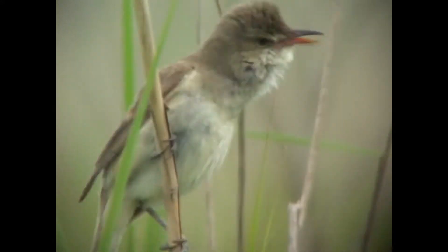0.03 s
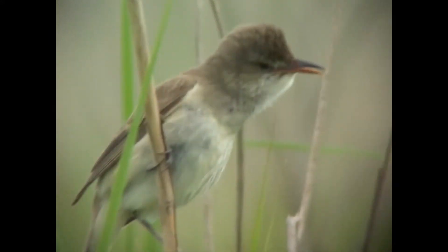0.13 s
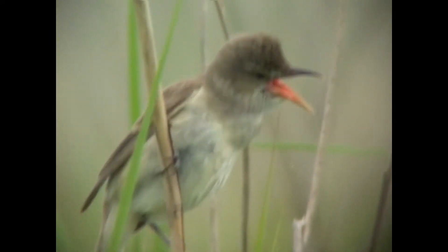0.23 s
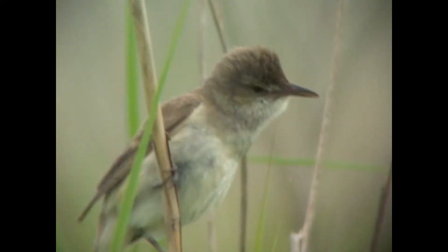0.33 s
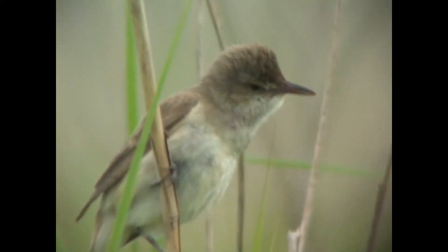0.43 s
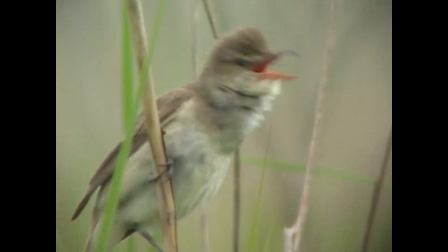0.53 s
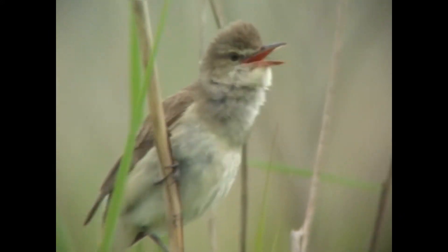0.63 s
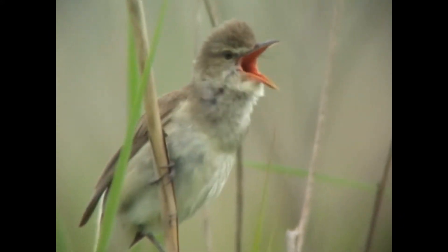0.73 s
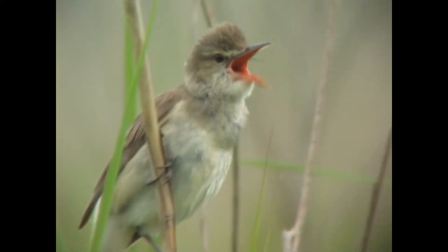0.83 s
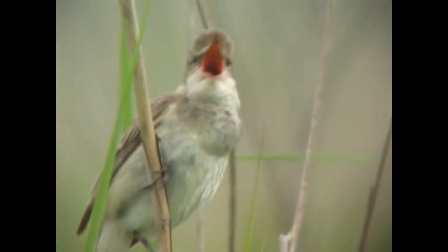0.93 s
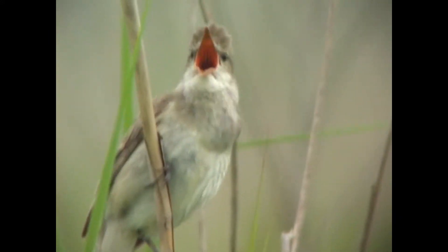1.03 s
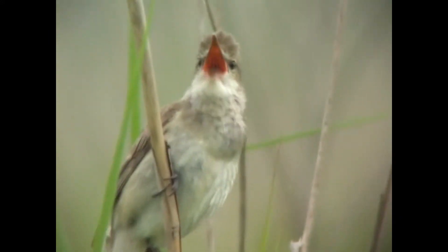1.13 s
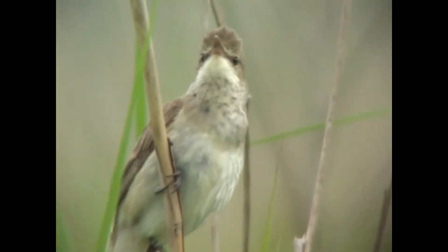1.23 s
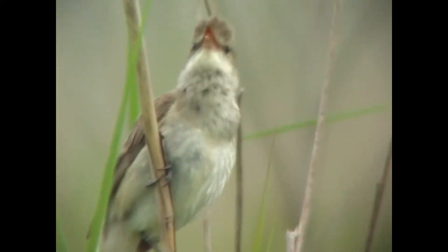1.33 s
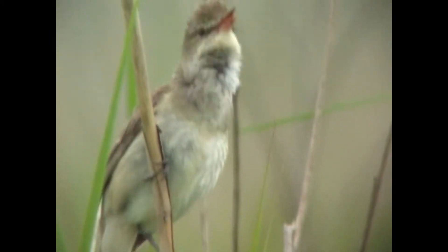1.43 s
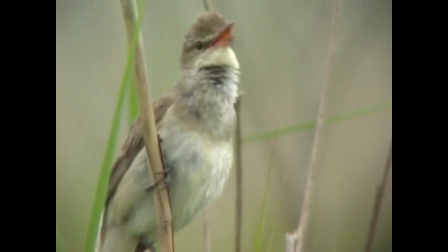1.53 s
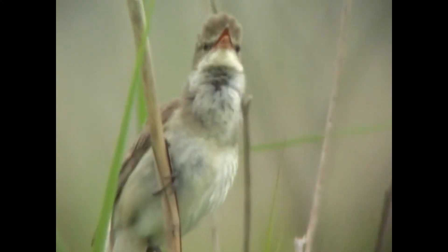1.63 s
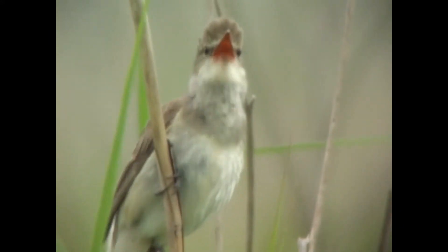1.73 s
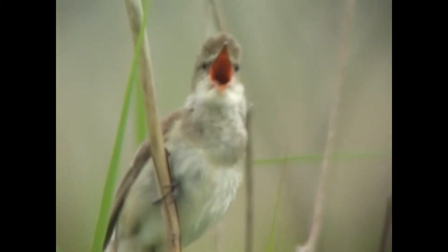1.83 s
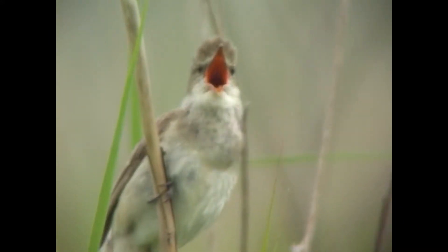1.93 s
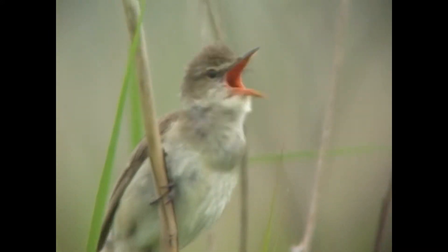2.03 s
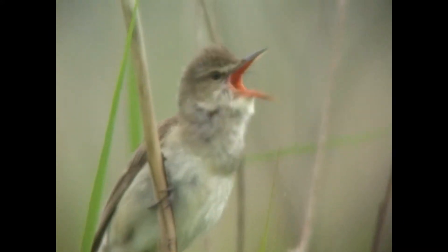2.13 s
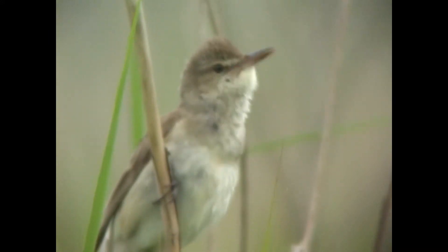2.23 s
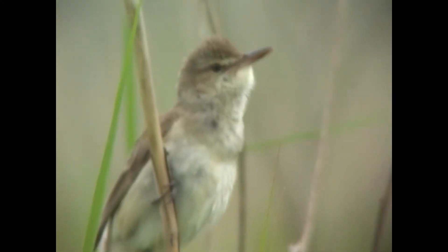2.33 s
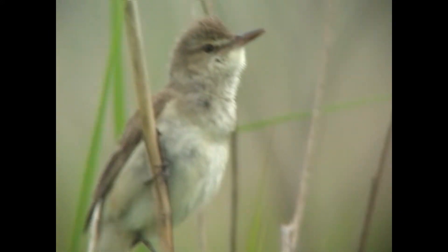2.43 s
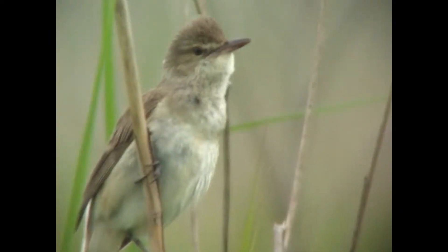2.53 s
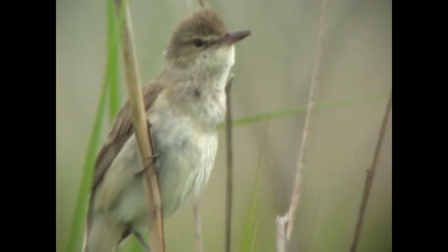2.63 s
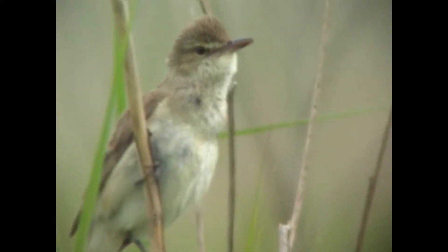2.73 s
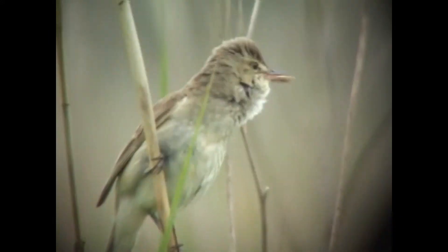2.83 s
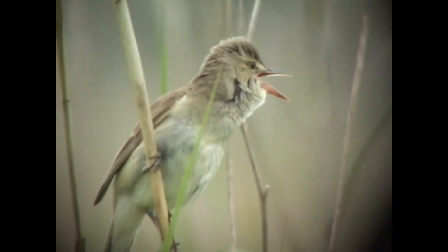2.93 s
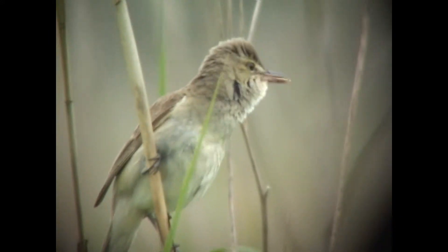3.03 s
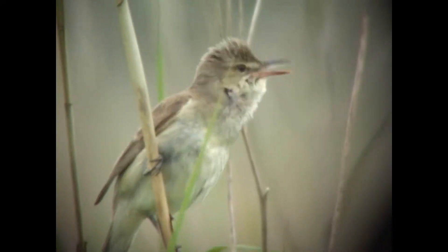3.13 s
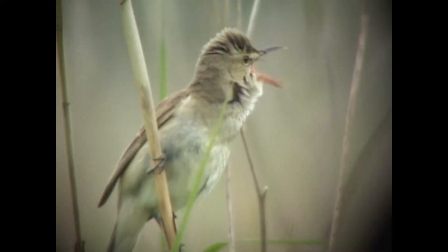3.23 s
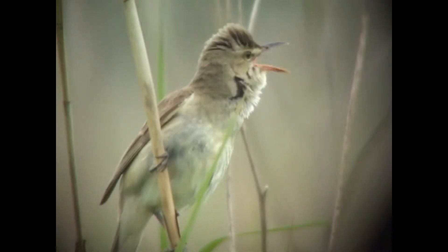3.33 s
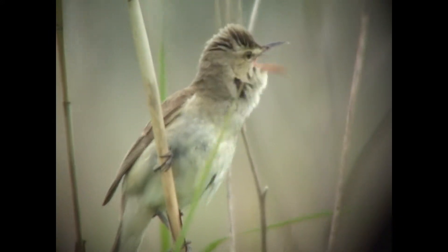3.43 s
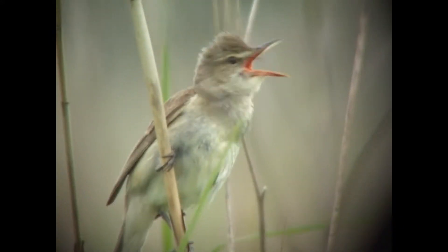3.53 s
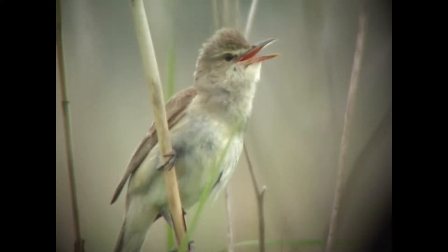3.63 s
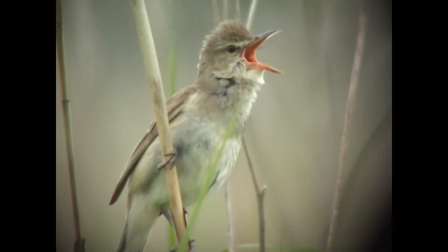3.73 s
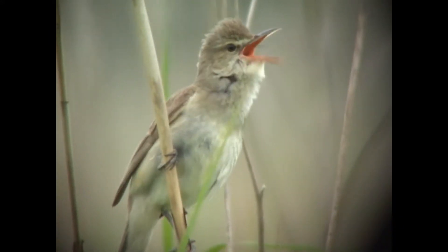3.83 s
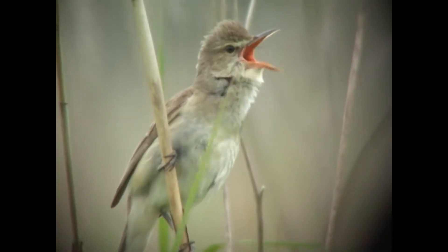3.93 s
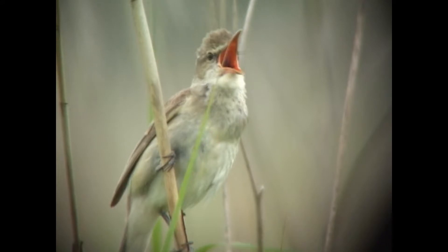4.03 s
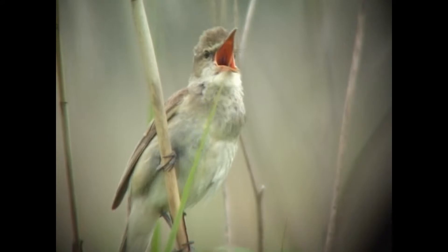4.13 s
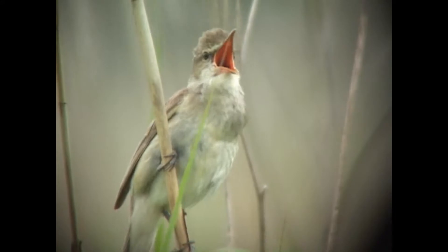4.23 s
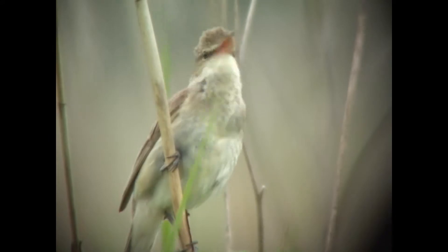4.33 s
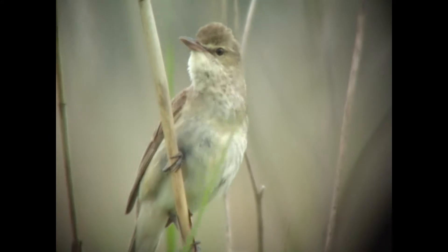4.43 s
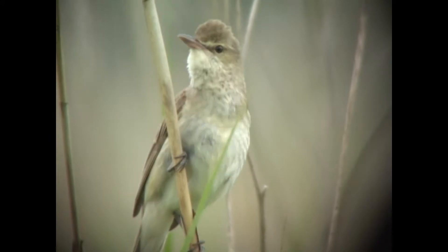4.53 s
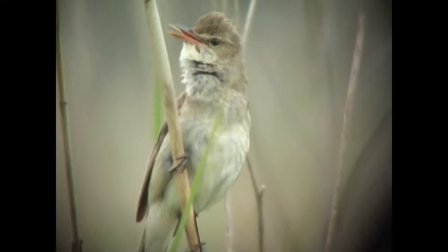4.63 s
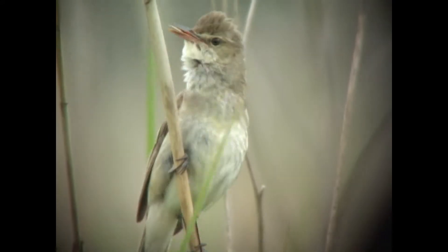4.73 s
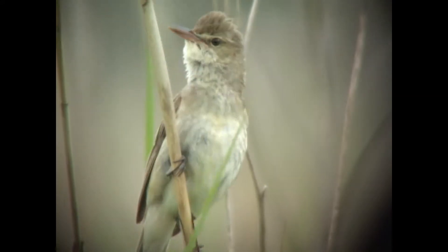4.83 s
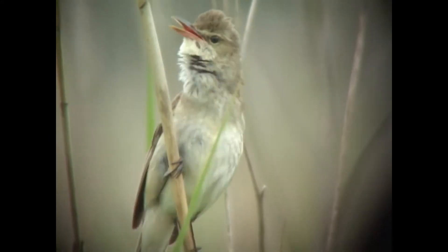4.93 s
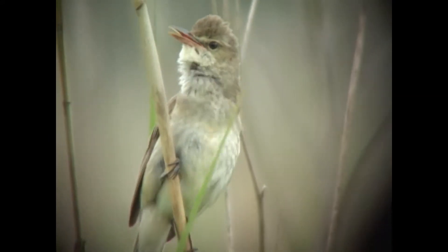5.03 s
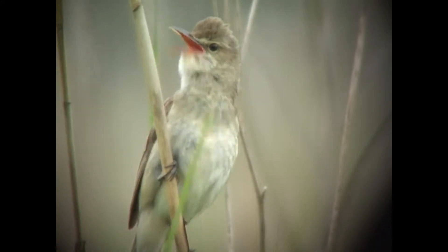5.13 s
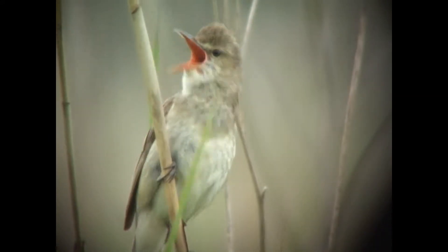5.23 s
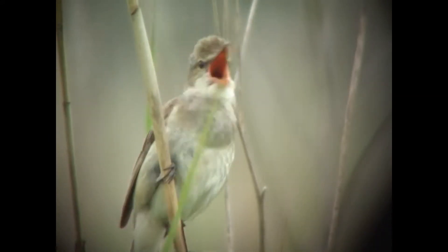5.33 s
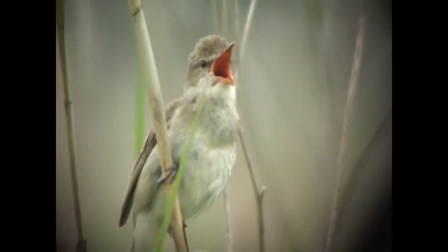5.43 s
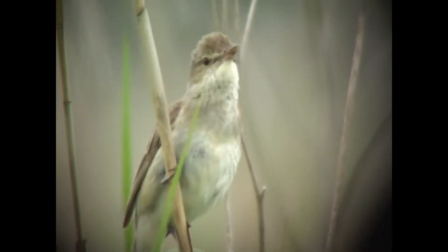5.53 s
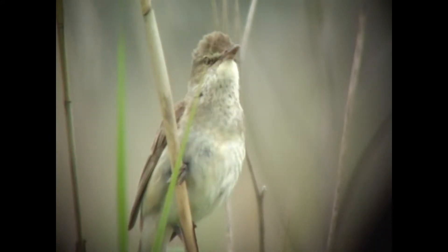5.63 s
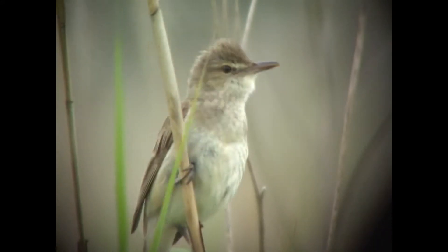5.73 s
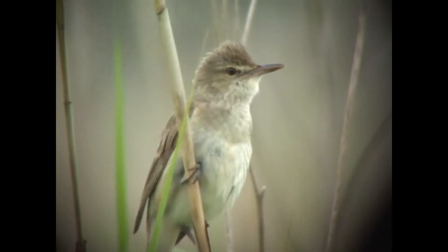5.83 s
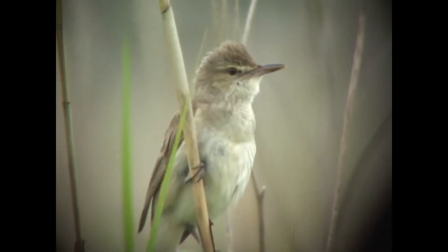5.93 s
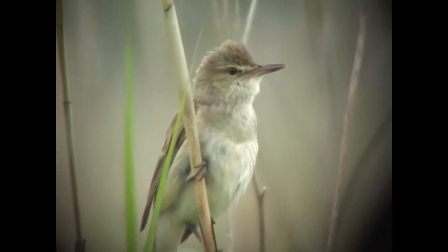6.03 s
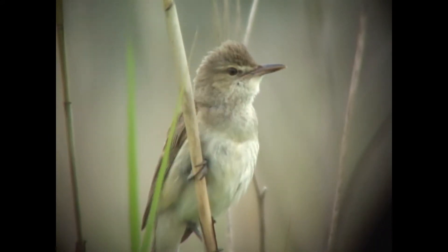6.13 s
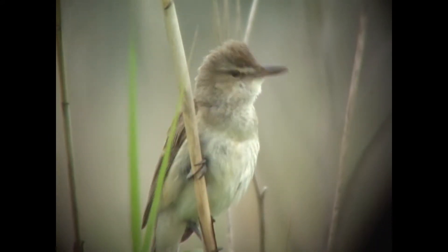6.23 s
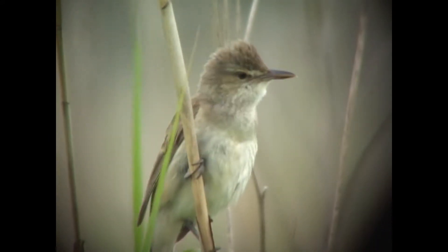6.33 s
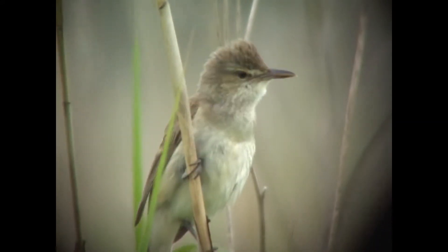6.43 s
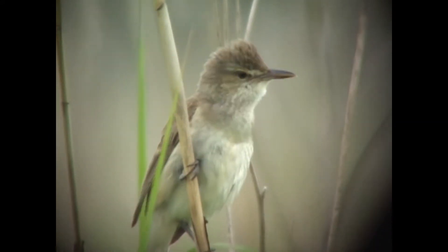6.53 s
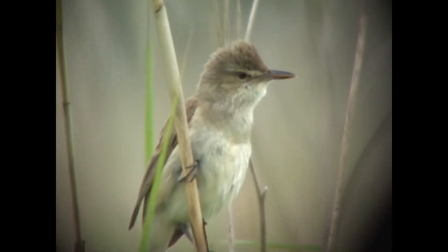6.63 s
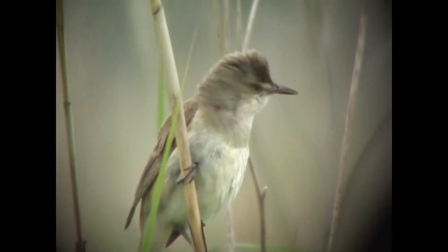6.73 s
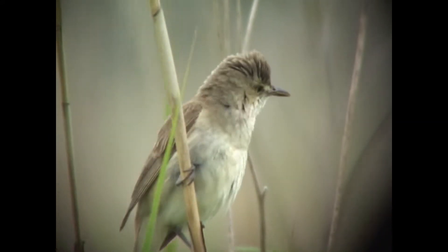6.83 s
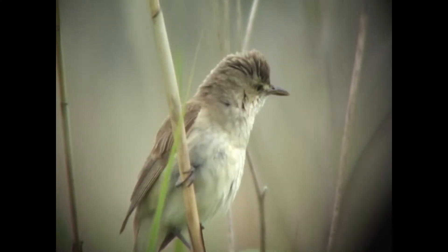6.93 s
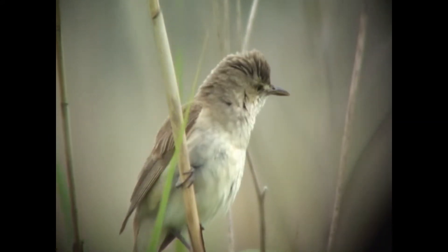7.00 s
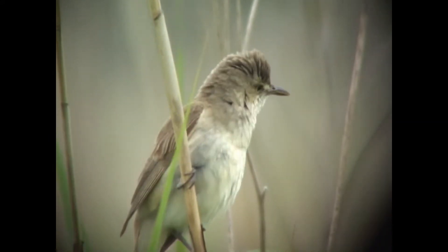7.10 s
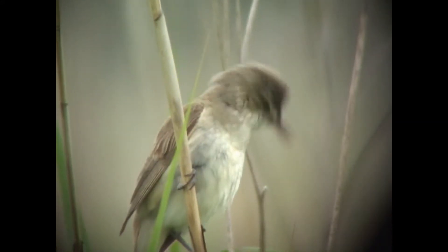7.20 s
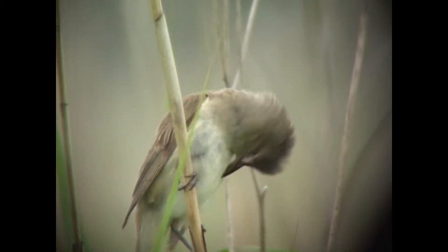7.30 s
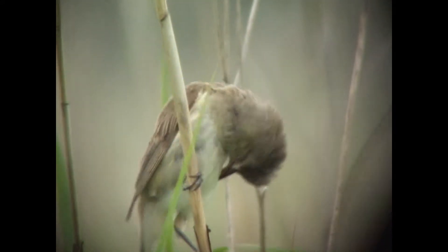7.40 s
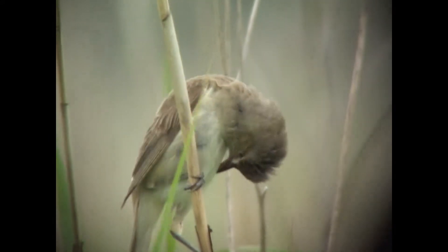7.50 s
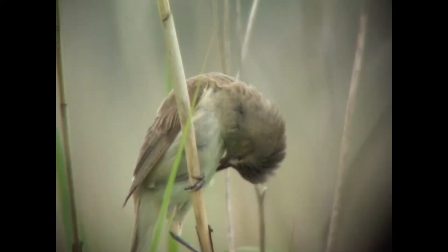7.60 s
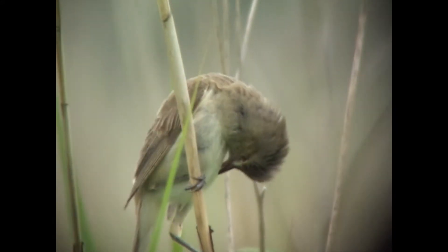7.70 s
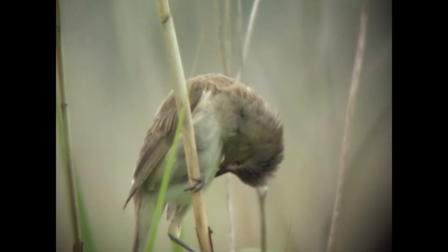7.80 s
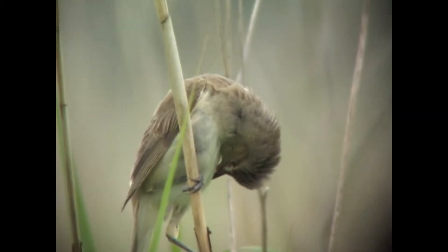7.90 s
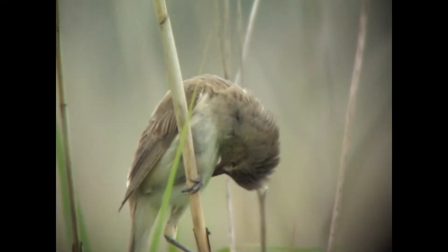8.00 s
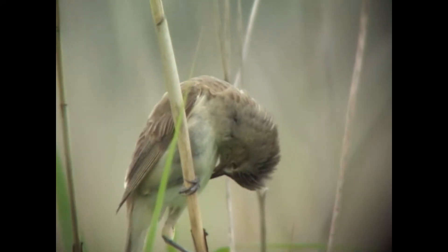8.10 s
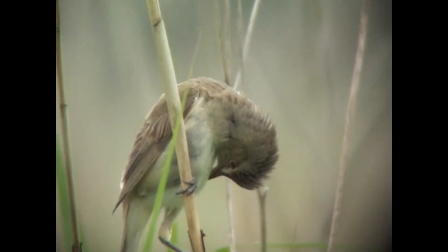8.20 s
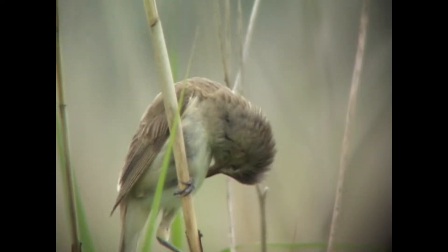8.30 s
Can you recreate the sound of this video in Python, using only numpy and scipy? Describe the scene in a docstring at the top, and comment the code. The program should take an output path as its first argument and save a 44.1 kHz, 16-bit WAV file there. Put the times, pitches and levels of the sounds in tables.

```python
"""Grating croaks come first, from a great reed warbler close in front of a stereo microphone in a reed bed.
Whistles, nasal buzzes, dry rattles and squeaky clacks follow: tones of its syrinx, or pulses rung through
throat and beak. A neighbour answers on the left, other birds call farther out, and the stems scatter
a short echo. A faint insect trill comes and goes on the right, over moving air and distant machinery."""
import sys
import numpy as np
from scipy import signal
from scipy.fft import rfft, irfft, next_fast_len
from scipy.io import wavfile
from scipy.ndimage import map_coordinates

SR = 44100
rng = np.random.default_rng(int(sys.argv[2]) if len(sys.argv) > 2 else 0)


def waveform_to_disk(signal):
    """Save audio, clipped to [-1, 1], as 16-bit WAV at the path in sys.argv[1]."""
    frames = np.transpose(np.atleast_2d(signal))
    scaled = np.clip(frames, -1, 1) * 32767
    samples = np.round(scaled).astype(np.int16)
    wavfile.write(sys.argv[1], SR, samples)


N = 368676

# spectra of the rush of air and of the rumble: frequency_hz, relative_db
RUSH_SPECTRUM = [(60, -27), (110, -14), (200, -8), (400, -10.5), (700, -11), (900, -10), (1130, -10),
                 (1550, -16), (2600, -15.5), (4000, -16.5), (6500, -18), (10500, -22.5)]
RUMBLE_SPECTRUM = [(12, -9), (25, -1.5), (45, 5), (60, 0.5), (100, -13), (170, -23), (400, -56)]
# their rise and fall: time_s, relative_db
RUSH_LEVELS = [(0, -59.5), (2.7, -60), (3.9, -59), (6.7, -58.5), (8.36, -60.5)]
RUMBLE_LEVELS = [(0.0, -61), (0.07, -53.5), (0.18, -60.5), (1.35, -59), (1.56, -47.5), (1.72, -52.5),
                 (1.77, -49.5), (2.23, -55.5), (5.26, -57.5), (7.8, -60), (8.1, -66), (8.36, -61)]
# how alike the rush is at the two capsules: frequency_hz, correlation
RUSH_LIKENESS = [(100, 0.095), (500, 0.082), (1200, 0.39), (2500, 0), (9000, 0)]
# low swells of air: peak_s, half_width_s, level_db
AIR_SWELLS = [(2.63, 0.23, -68), (3.6, 0.15, -69), (6.63, 0.34, -67)]
# distant machinery and a thin whine: pitch_hz, level_db, left_over_right_db, left_lead_rad
HUM_LINES = [(84.3, -55, 4, 0.24), (217.5, -66, -7, 2.5), (233.7, -83, -17, 1.5), (568, -72, -8.5, 3),
             (1110, -81, -11.5, 0.9), (6000, -84, -17.5, 2)]
# insect trills: start_s, end_s
INSECT_TRILLS = [(.078, .5), (1.301, 1.647), (2.3, 2.707), (2.87, 3.132), (3.475, 3.857), (4.417, 4.83),
                 (5.45, 5.884), (6.383, 6.844), (7.333, 7.746)]

# resonances of throat and beak: multiple_of_throat_hz, relative_db
RASP_SHAPE = [(.12, -50), (.25, -22), (.42, -29), (.58, -12), (.78, -4), (.97, 1.5), (1.3, -5), (1.5, -18),
              (1.8, -25.5), (2.2, -22.5), (2.601, -33.5)]
CROAK_SHAPE = [(.22, -59), (.4, -12.5), (.63, -34.5), (.83, -3.5), (.98, 0), (1.18, 1.5), (1.45, -24),
               (2, -23.5), (3, -36), (4, -33.5)]
BUZZ_SHAPE = [(.2, -58), (.4, -20), (.64, -33.5), (.78, -8.5), (1, 4), (1.22, -4), (1.45, -8),
              (1.75, -21.5), (2.3, -34), (2.9, -24.5), (3.4, -61)]
# partials of the syrinx: multiple_of_pitch, relative_db
CROAK_PARTIALS = [(1 / 3, -32), (1 / 2, -19), (5 / 6, -26), (0.96, 0), (7 / 6, -7), (4 / 3, -9),
                  (3 / 2, -15), (11 / 6, -24)]
SQUEAK_PARTIALS = [(.5, -29.5), (1, -1), (1.5, -19.5), (2, -29.5), (2.5, -24.5)]
NEIGHBOUR_PARTIALS = [(.5, -7), (1, 5.5), (1.5, -5), (2, -15)]

# close croaks, levels relative: start_s, growl_s, growl_db, stutter_s, stutter_db, grunts_per_s, pitch_hz
NEAR_CROAKS = [(0.031, 0.018, -48.5, 0.027, -40, 153, 2657), (0.216, 0.021, -45, 0.025, -39.5, 187, 2610),
               (1.535, 0.036, -37.5, 0.098, -39.5, 84, 2740), (1.748, 0.04, -38, 0.077, -42.5, 111, 2660),
               (4.790, .042, -41, 0.072, -47.5, 98, 2564), (5.077, 0.046, -40.5, 0.071, -44.5, 100, 2556)]
# close whistles: start_s, length_s, level_db, start_hz, middle_hz, end_hz, flutter_hz
NEAR_WHISTLES = [(0.358, 0.059, -39, 5300, 5430, 5740, 290), (0.41, 0.045, -35, 5930, 5640, 5220, 250),
                 (3.08, 0.051, -45, 4370, 4080, 4260, 51), (3.135, 0.052, -45.5, 4230, 4080, 3930, 20),
                 (3.692, 0.042, -43, 6820, 6360, 5440, 260), (3.738, 0.037, -43, 5920, 6420, 5280, 58)]
# close buzzes, levels relative: start_s, length_s, buzz_db, start_hz, top_hz, chip_db, upper_strength
NEAR_BUZZES = [(0.712, 0.076, -39, 558, 629, -37, 0.2), (0.883, .071, -37, 593, 648, -34.5, 0.56),
               (3.369, .075, -39.5, 565.5, 636, -38.5, 0.3), (3.545, 0.072, -37.5, 578, 620, -35.5, 0.58),
               (3.891, 0.072, -34, 598, 624.5, -32, 0.58), (4.057, 0.074, -33.5, 605.6, 625.7, -31, 0.62)]
# close rattle figures, a double beat then a single: start_s, double_db, single_db
NEAR_RATTLES = [(1.029, -38, -31.5), (1.111, -31, -33), (1.189, -31.5, -30), (1.269, -32.5, -32.5),
                (4.185, -32, -29), (4.269, -32, -30), (4.345, -32.5, -30.5), (4.423, -33.5, -32)]
# bursts within each beat: delay_s, length_s, relative_db, throat_hz
DOUBLE_BURSTS = [(0, 0.0071, 0, 4440), (.011, 0.0067, -0.5, 4570), (.027, .005, -16.5, 4300)]
SINGLE_BURSTS = [(.0415, 0.0084, -2, 4400), (.052, 0.006, -13, 4030)]
# close clacks with squeaks: start_s, clack_s, clack_db, throat_hz, squeak_s, squeak_db, middle_hz, end_hz
NEAR_CLACKS = [(1.948, 0.015, -29, 4320, .028, -30.5, 3700, 3310),
               (2.033, 0.013, -29, 4360, 0.022, -31.5, 3720, 3820),
               (2.119, 0.012, -31, 4420, 0.021, -34, 3720, 3800),
               (2.213, 0.013, -31, 4320, 0.025, -32.5, 3790, 4020),
               (2.3, .01, -31.5, 4240, 0.026, -36, 3930, 3880),
               (5.347, 0.014, -36, 3840, 0.019, -37, 3560, 3440),
               (5.435, 0.014, -35.5, 4110, 0.023, -38, 3550, 3800),
               (5.518, 0.014, -35, 4400, 0.027, -39.5, 3750, 3830),
               (5.624, 0.012, -34, 4420, 0.029, -38.5, 3860, 3780)]
# close, soft clucks: start_s, level_db, throat_hz
NEAR_CLUCKS = [(2.9, -51, 1780), (2.956, -57, 2150), (2.968, -48.5, 2400), (2.98, -47.5, 2120),
               (3.009, -50.5, 2070)]

# the neighbour's lone rasps: start_s, length_s, level_db, throat_hz
NEIGHBOUR_RASPS = [(.002, .012, -51.5, 2980), (.185, 0.035, -52, 2900), (.465, 0.05, -54, 3420),
                   (3.485, 0.011, -51, 3860), (3.801, 0.0075, -50.5, 4070), (3.99, 0.016, -52, 4400),
                   (4.91, .01, -50.5, 2898), (4.945, 0.012, -52.5, 2790), (5.03, 0.01, -53, 3760),
                   (5.232, 0.017, -55.5, 3000), (5.27, .015, -53.5, 2940), (5.303, 0.024, -53, 2950)]
# its runs of ticks: start_s, end_s, period_s
NEIGHBOUR_TICKS = [(.285, .635, .0227), (3.027, 3.26, .0533), (4.529, 4.61, .034)]
# loudness of each run: level_db
TICK_LEVELS = [-55.5, -49.5, -53.5]
# its chips: start_s, length_s, level_db
NEIGHBOUR_CHIPS = [(5.349, 0.021, -42), (5.409, 0.022, -38.5), (5.48, 0.019, -37), (5.567, 0.017, -36.5)]
# its three-part calls: start_s, tick_db, slur_db
NEIGHBOUR_CALLS = [(5.696, -40.5, -52), (5.858, -42.5, -53.5), (6.009, -42, -58)]
# pure slurs far off to the right: start_s, length_s, level_db, start_hz, middle_hz, end_hz
DISTANT_SLURS = [(1.89, 0.058, -61.5, 2070, 1710, 1430), (2.376, 0.032, -60, 2620, 2320, 2860),
                 (2.423, 0.041, -59, 1870, 1950, 2100), (2.518, 0.034, -63, 1650, 1770, 1670),
                 (2.579, 0.043, -66.5, 1410, 1310, 1330), (4.334, 0.268, -68, 1670, 1618, 1610),
                 (4.655, 0.073, -61, 1390, 1630, 1590), (4.8, 0.048, -58, 1690, 1880, 2140),
                 (4.953, 0.056, -59.5, 2310, 1934, 1240), (5.135, 0.041, -62, 4500, 5050, 5450),
                 (6.61, 0.046, -67.5, 3950, 3150, 2910), (6.685, .04, -70, 5700, 5600, 5100),
                 (6.815, .18, -70, 3610, 3970, 4010)]
# a small bird far ahead: start_s, level_db, start_hz
DISTANT_PEEPS = [(5.262, -63, 5100), (5.954, -64, 4800), (6.427, -62.5, 4900), (6.49, -59, 5040),
                 (7.538, -63, 5000), (7.591, -54.5, 5540), (7.645, -52, 5400)]
# two-note calls far off to the left: start_s, level_db, pitch_hz
DISTANT_PAIRS = [(7.8, -62.5, 2800), (8.139, -56, 3660), (8.268, -53, 3740)]

SIDES = np.array([[.5], [-.5]])  # half of a difference goes to the left capsule, half to the right


def amp(db):
    return 10 ** (np.asarray(db) / 20)


def unit(x):
    return x / np.sqrt(np.mean(x ** 2) + 1e-20)


def along(points, hz):
    """Read (frequency_hz, value) points on a log frequency axis."""
    frequencies, values = np.transpose(points)
    return np.interp(np.log(hz + 1e-6), np.log(frequencies), values)


def curve(rows):
    """One value per sample from (time_s, value) rows."""
    return np.interp(np.arange(N) / SR, *np.transpose(rows))


def wobble(rate, size):
    """A smooth random curve with rate knots a second."""
    knots = rng.standard_normal(int(size * rate / SR) + 4)
    return map_coordinates(knots, [np.arange(size) * rate / SR])


def filtered(x, response):
    """Multiply the spectrum of x by response(hz)."""
    size = next_fast_len(N + 8192)
    return irfft(rfft(x, size) * response(np.fft.rfftfreq(size, 1 / SR)), size)[..., :N]


def add(track, start_s, sound):
    part = track[max(round(start_s * SR), 0):][:len(sound)]
    part += sound[:len(part)]


def clock(length_s):
    """Time within a note: t in seconds, u from 0 to 1."""
    t = np.arange(max(int(length_s * SR), 32)) / SR
    return t, t / t[-1]


def envelope(t, rise_s, fall_s):
    """A smooth onset and release."""
    opening = np.sin(np.pi / 2 * np.minimum(t / rise_s, 1))
    closing = np.sin(np.pi / 2 * np.minimum((t[-1] - t) / fall_s, 1)) ** 2
    return opening * closing


def phase(hz):
    return 2 * np.pi * np.cumsum(hz) / SR


def slur(u, start_hz, middle_hz, end_hz):
    """A pitch arc through three points."""
    return start_hz * (1 - u) * (1 - 2 * u) + middle_hz * 4 * u * (1 - u) + end_hz * u * (2 * u - 1)


def pulses(rate_hz, scatter_db):
    """One pulse per cycle of the syrinx, each of its own size."""
    samples = np.arange(len(rate_hz))
    cycles = np.cumsum(rate_hz) / SR + .9
    onsets = np.interp(np.arange(1, max(int(cycles[-1]), 1) + 1), cycles, samples)
    return amp(scatter_db * rng.standard_normal(len(onsets))) @ np.sinc(samples - onsets[:, None])


def throat(x, shape, hz, size=1024):
    """Ring x through the resonance of throat and beak, keeping a short tail."""
    cepstrum = irfft(np.log(amp(along(shape, np.fft.rfftfreq(size, 1 / SR) / hz))))
    cepstrum[1:size // 2] *= 2  # minimum phase: the ringing follows each pulse
    cepstrum[size // 2 + 1:] = 0
    rung = np.convolve(x, irfft(np.exp(rfft(cepstrum)))[:size // 4])
    return rung / np.sqrt(np.sum(rung ** 2) / len(x) + 1e-20)


def rasp(length_s, shape, hz, rate_hz, jitter, breath):
    """Chaotic syrinx pulses with a little turbulence, through the throat."""
    t, _ = clock(length_s)
    beats = unit(pulses(rate_hz * np.exp(jitter * wobble(rate_hz, len(t))), scatter_db=-0.5))
    source = beats + breath * rng.standard_normal(len(t))
    return throat(source * envelope(t, 0.26 * t[-1], .42 * t[-1]), shape, hz)


def voiced(hz, partials, hoarse):
    """A syrinx tone built from partials; hoarseness shakes its pitch and level."""
    turn = phase(hz * (1 + hoarse * wobble(2206, len(hz))))
    tone = sum(amp(db) * np.sin(k * turn + rng.uniform(0, 2 * np.pi)) for k, db in partials)
    return unit(tone * (1 + 2 * hoarse * wobble(1518, len(hz))))


def air():
    """A soft rush over the marsh with low swells, and a rumble that differs at each capsule."""
    def mid_and_side(hz):
        angle = np.arccos(np.clip(along(RUSH_LIKENESS, hz), -1, 1)) / 2
        return amp(along(RUSH_SPECTRUM, hz)) * [np.cos(angle), np.sin(angle)]

    def band(spectrum):
        return unit(filtered(rng.standard_normal((2, N)), lambda hz: amp(along(spectrum, hz))))

    mid, side = filtered(rng.standard_normal((2, N)), mid_and_side)
    rush = unit(np.array([mid + side, mid - side])) * amp(curve(RUSH_LEVELS) + 0.72 * wobble(4, N))
    t = np.arange(N) / SR
    swells = amp(-80) + sum(amp(db) * np.exp(-((t - s) / width) ** 2) for s, width, db in AIR_SWELLS)
    low_air = band([(150, -45), (300, -4), (400, 1), (520, -6.5), (900, -26), (2000, -58)])
    rumble = amp(curve(RUMBLE_LEVELS) + 4) * band(RUMBLE_SPECTRUM)
    return rush + swells * low_air + rumble


def machinery():
    """Distant hums and a thin whine, wavering slightly in pitch and level."""
    out = np.zeros((2, N))
    for hz, db, pan_db, lead_rad in HUM_LINES:
        turn = phase(hz + 0.03 * np.sqrt(hz) * wobble(3, N))
        level = amp(db + SIDES * pan_db + 0.49 * wobble(3.2, N))
        out += level * np.sqrt(2) * np.sin(turn + SIDES * lead_rad)
    return out


def rasps(rows, rate_hz):
    """Dry bursts of syrinx pulses, one for each row."""
    out = np.zeros(N)
    for s, length, db, hz in rows:
        add(out, s, amp(db) * rasp(length, RASP_SHAPE, hz, rate_hz, jitter=0.253, breath=0.29))
    return out


def croaks():
    """Close by, an arched growl falls apart into fading grunts that sink in pitch."""
    out = np.zeros(N)
    for s, growl_s, growl_db, stutter_s, stutter_db, grunts_per_s, hz in NEAR_CROAKS:
        t, u = clock(growl_s)
        tone = voiced(hz * slur(u, 0.94, 1.03, 0.884), CROAK_PARTIALS, hoarse=0.027 + 0.084 * u ** 2)
        grit = rasp(growl_s, CROAK_SHAPE, hz * 0.973, rate_hz=480, jitter=0.15, breath=0.34)[:len(t)]
        flow = envelope(t, 0.0025, 0.0015) * amp(3.3 * np.sin(np.pi * u))
        add(out, s, amp(growl_db) * unit((tone + (0.36 + .5 * u) * grit) * flow))
        t, u = clock(0.88 / grunts_per_s)
        for delay in np.arange(0, stutter_s - .003, 1 / grunts_per_s):
            late = delay / stutter_s
            tone = voiced(hz * (.99 - .1 * late - 0.18 * u), CROAK_PARTIALS, hoarse=0.11)
            grit = rasp(t[-1], CROAK_SHAPE, hz * 0.935, rate_hz=783, jitter=0.27, breath=0.39)[:len(t)]
            grunt = unit((tone + 1.35 * grit) * envelope(t, 0.0046, 0.0044))
            onset_s = s + growl_s + delay + rng.normal(0, .0003)
            add(out, onset_s, amp(stutter_db - 1 - 7.8 * late + rng.normal(0, 1)) * grunt)
    return out


def chatter(count=140):
    """Very faint twitters from the far side of the marsh."""
    out = np.zeros(N)
    for when, size, pitch, bend in rng.random((count, 4)):
        t, u = clock(0.024 + .03 * bend)
        hz = (2000 + 1700 * pitch) * (1 + .5 * (bend - .6) * u)
        twitter = voiced(hz, [(1, 0)], hoarse=.07) * envelope(t, .006, .01)
        add(out, when * N / SR, amp(-77.5 + 11.5 * size) * twitter)
    return out


def insect():
    """Faint trills of tiny falling chirps that swell and then stop."""
    out = np.zeros(N)
    for start_s, end_s in INSECT_TRILLS:
        t, _ = clock(end_s - start_s)
        stroke = phase(90 + 2 * wobble(11, len(t)))
        hz = 7180 - 200 * np.sin(stroke) + 90 * wobble(900, len(t))
        chirps = np.sin(phase(hz)) * (1 + np.cos(stroke))
        add(out, start_s, amp(-70) * unit(chirps * envelope(t, .12, 0.0063)))
    return out


def neighbour_ticks(length_s=.0075, throat_hz=3690):
    """Even runs of dry ticks, each a little louder or softer."""
    ticks = [(s, length_s, db + rng.normal(0, 1), throat_hz)
             for run, db in zip(NEIGHBOUR_TICKS, TICK_LEVELS) for s in np.arange(*run)]
    return rasps(ticks, rate_hz=1200)


def whistles():
    """High swelling tones close by; the pitch dips in quick jerks that weaken and roughen the sound."""
    out = np.zeros(N)
    for s, length, db, *arc, flutter_hz in NEAR_WHISTLES:
        t, u = clock(length)
        jerk = np.sin(phase(122 + 12 * wobble(52, len(t))) / 2) ** 4
        dip_hz = flutter_hz * np.sin(np.pi * u) * (2 * jerk * (1 + 0.31 * wobble(1843, len(t))) - .6)
        turn = phase(slur(u, *arc) - dip_hz)
        tone = (np.sin(turn) + amp(-25) * np.sin(2 * turn)) * amp(-dip_hz / 130)
        hiss = rasp(length, RASP_SHAPE, arc[1] * 0.95, rate_hz=1300, jitter=0.21, breath=0.75)[:len(t)]
        flow = envelope(t, 0.0056, 0.0092) * amp(10.4 * u)
        add(out, s, amp(db) * unit((tone + flutter_hz / 2300 * hiss) * flow))
    return out


def buzzes():
    """A soft lead-in, a chip, then an arch of pulses; every second one also rings a higher resonance."""
    upper_shape = [(.5, -32), (.75, -4), (1, 9.5), (1.15, -15),
                   (1.4, -22), (1.75, -43), (2.2, -19), (2.5, -38)]
    out = np.zeros(N)
    for s, length, db, start_hz, top_hz, chip_db, upper_strength in NEAR_BUZZES:
        lead_in = rasp(0.015, BUZZ_SHAPE, 2930, rate_hz=240, jitter=0.26, breath=0.78)
        add(out, s - .04, amp(chip_db - 18) * lead_in)
        chip = rasp(0.016, BUZZ_SHAPE, 5.08 * start_hz, rate_hz=730, jitter=0.2006, breath=0.14)
        add(out, s - .022, amp(chip_db) * chip)
        t, u = clock(length)
        # the beak opens and closes: pitch and resonance rise and fall together
        gape = np.interp(u, [0, .2, .45, .65, .8, 1], [0.1, 0.068, 0.747, 0.94, 0.876, .15])
        waver = (0.014 + 0.026 * np.exp(-u / 0.14)) * wobble(498, len(t))
        hz = (start_hz + (top_hz - start_hz) * gape) * (1 + waver)
        flow = envelope(t, 0.0018, 0.011) * amp(2 * np.sin(np.pi * u))
        source = flow * (unit(pulses(hz, scatter_db=1)) + .32 * rng.standard_normal(len(t)))
        opening = np.pad(gape, (0, 255), mode="edge")  # held while the throat rings out
        narrow = (1 - opening) * throat(source, BUZZ_SHAPE, 5.02 * start_hz)
        wide = opening * throat(source, BUZZ_SHAPE, 5.03 * top_hz)
        upper = throat(flow * pulses(hz / 2, scatter_db=-0.5), upper_shape, 4280)
        add(out, s, amp(db) * unit(narrow + wide + upper_strength * (0.89 + .5 * opening) * upper))
    return out


def rattles():
    """Fast dry rattles close by: double and single beats take turns."""
    bursts = [(s + delay, length, beat_db + db, hz)
              for s, double_db, single_db in NEAR_RATTLES
              for beat, beat_db in [(DOUBLE_BURSTS, double_db), (SINGLE_BURSTS, single_db)]
              for delay, length, db, hz in beat]
    return rasps(bursts, rate_hz=1100)


def glides(rows):
    """Pure gliding tones from birds farther out in the marsh."""
    out = np.zeros(N)
    for s, length, db, *arc in rows:
        t, u = clock(length)
        add(out, s, amp(db) * unit(np.sin(phase(slur(u, *arc))) * envelope(t, 0.0067, 0.0024)))
    return out


def clacks(squeak_delay_s=.022, start_hz=3210):
    """A hard rasp close by, then a squeak that always rises from the same pitch."""
    hard = [row[:4] for row in NEAR_CLACKS]
    tonal = [(s + squeak_delay_s, length, db, start_hz, middle_hz, end_hz)
             for s, _, _, _, length, db, middle_hz, end_hz in NEAR_CLACKS]
    return rasps(hard, rate_hz=1200) + squeaks(tonal, SQUEAK_PARTIALS, hoarse=0.083)


def squeaks(rows, partials, hoarse):
    """Gliding syrinx tones that start hoarse and clear as they fade."""
    out = np.zeros(N)
    for s, length, db, *arc in rows:
        t, u = clock(length)
        tone = voiced(slur(u, *arc), partials, hoarse * np.exp(-u / 0.51))
        add(out, s, amp(db) * unit(tone * envelope(t, 0.0026, 0.0078) * amp(-5 * u)))
    return out


def clucks(length_s=0.0092):
    """Quiet rasps close by, through a low-tuned throat."""
    return rasps([(s, length_s, db, hz) for s, db, hz in NEAR_CLUCKS], rate_hz=1200)


def distant_peeps(length_s=0.015):
    """A small bird's thin glides, falling ever faster."""
    return glides([(s, length_s, db, hz, hz * 0.924, hz * .76) for s, db, hz in DISTANT_PEEPS])


def neighbour_chips(arc_hz=(6030, 4500, 3960)):
    """The same steep downward glide, repeated."""
    return glides([(s, length, db, *arc_hz) for s, length, db in NEIGHBOUR_CHIPS])


def neighbour_calls(tick_hz=4260, squeak_hz=(3430, 3324, 3280), slur_hz=(1830, 2490, 2790)):
    """A tick, a hoarse squeak and a pure upward slur, alike each time."""
    ticks = [(s, .009, db, tick_hz) for s, db, _ in NEIGHBOUR_CALLS]
    rough = [(s + .015, .018, db - 2.5, *squeak_hz) for s, db, _ in NEIGHBOUR_CALLS]
    rising = [(s + .049, .022, db, *slur_hz) for s, _, db in NEIGHBOUR_CALLS]
    return rasps(ticks, rate_hz=990) + squeaks(rough, NEIGHBOUR_PARTIALS, hoarse=0.15) + glides(rising)


def distant_pairs(length_s=.015, spacing_s=.025, sag=0.081):
    """Two hoarse, sagging notes, the second lower and softer."""
    notes = [note for s, db, hz in DISTANT_PAIRS
             for note in [(s, db, hz), (s + spacing_s, db - 2, hz * .86)]]
    sagging = [(s, length_s, db, hz * (1 + sag), hz, hz * (1 - sag)) for s, db, hz in notes]
    return squeaks(sagging, [(1, 0)], hoarse=0.23)


def reeds(x, t60_s, wet_db):
    """Many stems scatter the sound into a short, diffuse echo with a faint longer tail."""
    t, _ = clock(.5)
    decay = amp(-60 * t / t60_s) + amp(-22.5 - 60 * t / 1.17)
    tail = rng.standard_normal((2, len(t))) * decay * np.minimum(t / 0.0037, 1)
    return amp(wet_db) * signal.fftconvolve(x[None], tail / np.linalg.norm(tail[0]), axes=1)[:, :N]


def placed(x, pan, lead_ms):
    """A source at the two capsules: pan is (frequency_hz, left_over_right_db); left leads by lead_ms."""
    return filtered(x, lambda hz: amp(SIDES * along(pan, hz))
                    * np.exp(2j * np.pi * hz * SIDES * lead_ms / 1000))


def scene():
    """From the microphone: the singer close ahead, a neighbour on the left, the rest farther off."""
    near = rattles() + clacks() + clucks() + amp(2) * buzzes() + amp(2.5) * croaks() + whistles()
    left = rasps(NEIGHBOUR_RASPS, rate_hz=990) + neighbour_ticks() + neighbour_calls()
    left += distant_pairs() + neighbour_chips() + chatter()
    ahead, right = distant_peeps(), glides(DISTANT_SLURS)
    birds = placed(near, [(1500, -0.36), (2800, 1.2), (4500, -1.1), (9000, -1.6)], lead_ms=-0.0058)
    birds += placed(left, [(2000, 6), (5000, 7.4)], lead_ms=0.11)
    birds += placed(ahead, [(5000, -1)], lead_ms=.005)
    birds += placed(right, [(1600, 0)], lead_ms=-0.076)
    echo = reeds(near, t60_s=0.08, wet_db=-11.5)
    echo += reeds(left, t60_s=0.11, wet_db=-7)
    echo += reeds(ahead + right, t60_s=.087, wet_db=-9)
    trills = placed(insect(), [(7000, -9.5)], lead_ms=-0.033)
    return birds + echo + trills + machinery() + air()


def record(dry):
    """The microphone chain cuts off steeply above its band limit."""
    top_hz = 10650
    return filtered(dry, lambda hz: 1 / np.sqrt(1 + (hz / top_hz) ** 160))


dry = scene()
out = record(dry)
waveform_to_disk(out)
```